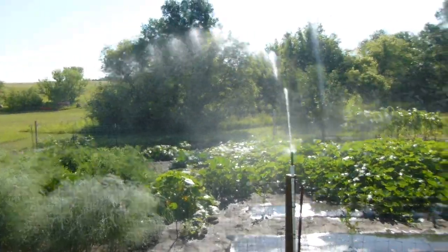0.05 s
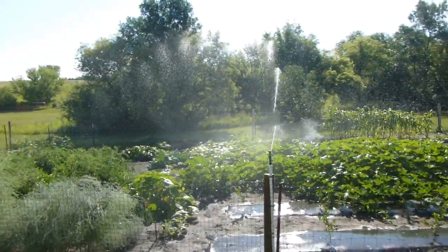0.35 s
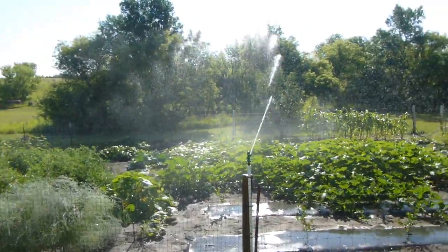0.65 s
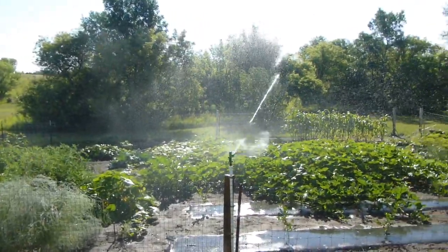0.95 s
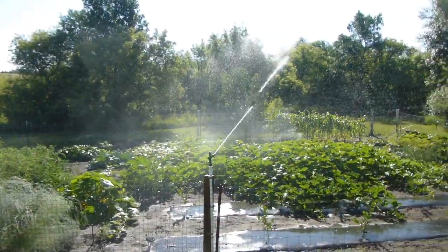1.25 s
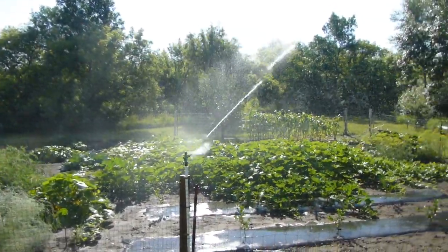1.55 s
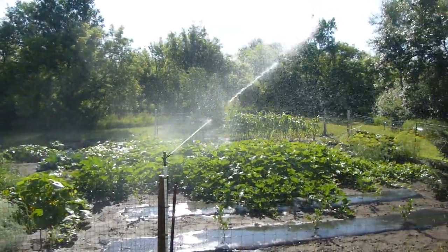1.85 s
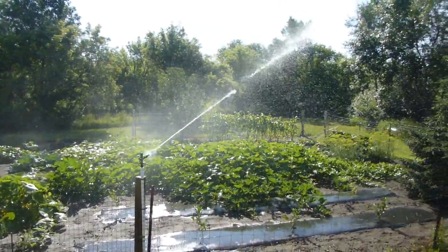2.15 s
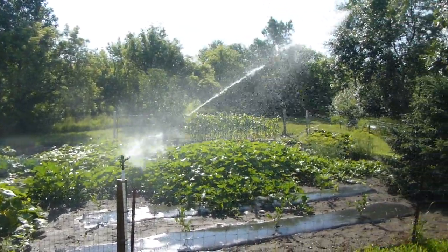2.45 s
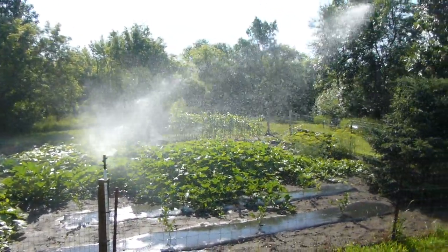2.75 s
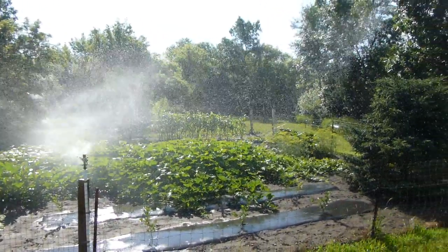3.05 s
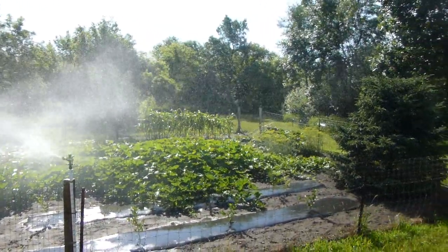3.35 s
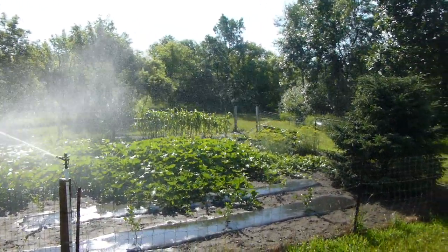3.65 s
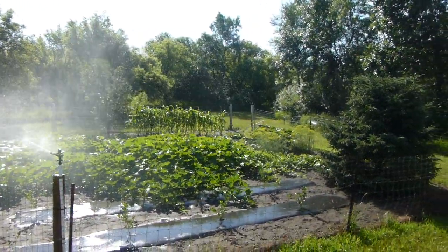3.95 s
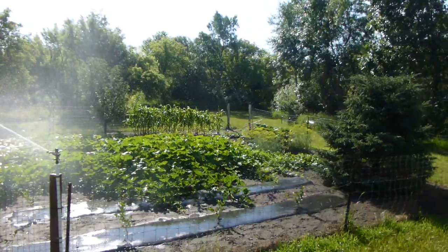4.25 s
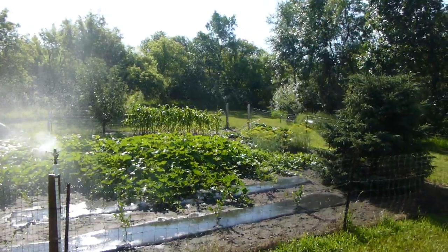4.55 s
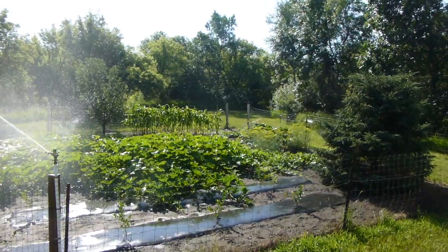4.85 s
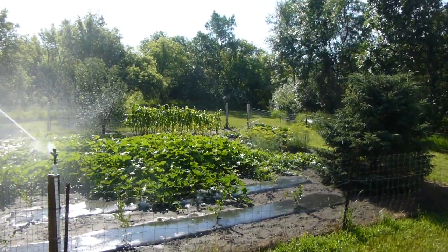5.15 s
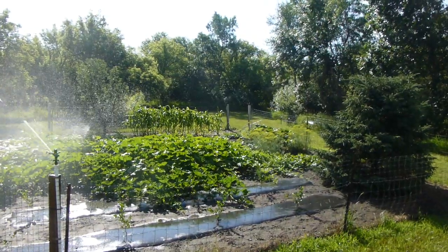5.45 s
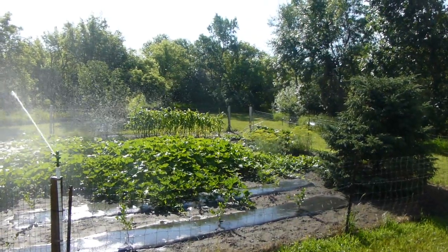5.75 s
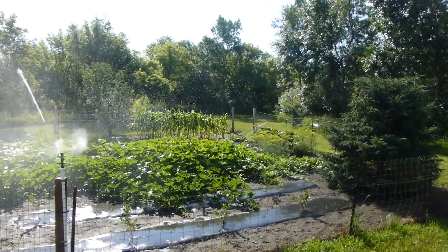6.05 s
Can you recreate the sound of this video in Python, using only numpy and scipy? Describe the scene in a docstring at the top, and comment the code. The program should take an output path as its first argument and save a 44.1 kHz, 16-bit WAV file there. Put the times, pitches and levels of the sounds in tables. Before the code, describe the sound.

Steady, splashy ticks from a garden sprinkler break into a brief, rapid hissing rattle and carry on, with drops pattering softly on leaves.

```python
"""Wet garden. An impact sprinkler on a post steps round at 8 Hz, chatters back at 21 Hz, steps on.
Each step: the sprung arm cuts into the jet, strikes the frame and leaves the jet.
The frame rings differently as the head turns. Throughout, drops patter on leaves and soil,
an insect buzzes thinly and a far engine drones. Air puffs and soft bumps reach the microphone."""
import sys
import numpy as np
from scipy import signal
from scipy.fft import rfft, irfft
from scipy.io import wavfile

SR = 44100
rng = np.random.default_rng(int(sys.argv[2]) if len(sys.argv) > 2 else 0)


def bounce(signal):
    """Save signal as a 16-bit WAV file at the path given by the first command-line argument."""
    frames = np.transpose(np.atleast_2d(signal))
    limited = np.clip(frames, -1, 1)
    pcm = np.round(limited * 32767).astype(np.int16)
    wavfile.write(sys.argv[1], SR, pcm)


N = 272979
TIME_S = np.arange(N) / SR

# drops on soil or leaves (time [s], level [dB])
PATTER_LEVELS = [(0, -42), (2.4, -42.5), (3.35, -38), (3.65, -42), (4.15, -39), (4.75, -47.5),
                 (5.35, -44.5), (6.19, -43.5)]
# insect swell and fade (time [s], level [dB])
INSECT_LEVELS = [(0, -45.5), (1.4, -46), (2, -42.5), (2.9, -41), (4.1, -50), (4.7, -43), (5.7, -42),
                 (6.19, -39)]
# engine harmonics (order [x turning rate], level [dB])
ENGINE_ORDERS = [(3, -74), (4, -62.5), (5, -60.5), (6, -56), (7, -60), (8, -64), (9, -63.5), (10, -59.5),
                 (11, -58), (12, -59.5), (13, -60.5), (16, -64), (19, -62)]
# forward sweeps (first strike [s], strikes [count], period [s], period change [s/swing])
FORWARD_SWEEPS = [(.01446, 21, .124017, -.0000204), (3.51238, 22, .122351, .0001295)]
# forward step levels (time [s], strike [dB], splash [dB], knock [dB])
STEP_LEVELS = [(0, -19, -26.5, -30.5), (.9, -19, -26.5, -26.5), (1.4, -18.5, -25, -25.5),
               (2.15, -19.5, -25, -31), (2.49, -17.5, -24, -25), (3.5, -18, -26.5, -32),
               (4.2, -21.5, -25.5, -32.5), (4.8, -23.5, -27, -29.5), (5.4, -22, -27, -30),
               (6.19, -24, -25.5, -30)]
# nozzle direction (time [s], heading [deg right of ahead])
NOZZLE_HEADING = [(0, -8), (2.49, 62), (3.42, -87), (6.19, -12)]
# sprinkler position (time [s], left minus right [dB])
SPRINKLER_PAN = [(0, -1), (1.75, 1.6), (4.2, 4.5), (6.19, 4)]
# frame modes (frequency [Hz], level [dB], t60 [s], loudest heading [deg], lobe width [deg])
FRAME_MODES = [(1538, -8, 0.038, 58, 17), (1565, 0, 0.033, -69.5, 11.5), (2680, -1, 0.021, 45, 15),
               (2980, 5, 0.018, 41, 16), (3027, 2.5, 0.028, 27, 13), (3103, 5, 0.038, -12, 23),
               (3166, 6, 0.028, -35, 23.7), (3535, 1, 0.023, 40, 27), (3587, 2, 0.04, -63.5, 11),
               (4095, -5, 0.045, 41, 19), (4140, -4, 0.032, -69, 16), (4670, 3, 0.03, -66, 15),
               (5440, -6, 0.043, 30, 32), (6100, 4, 0.034, 44, 14), (6540, 7, .015, 61, 6),
               (7240, 8.5, 0.02, 10.5, 10.5), (7530, 3, 0.018, 14, 54), (8140, 6, 0.031, 38, 12),
               (9400, 20.5, 0.0036, -55, 14), (9900, 1, 0.03, 44, 16), (9820, 7.5, 0.027, -39, 19),
               (10500, 6, 0.018, -86, 11), (10700, 16, 0.0077, -29, 24), (11400, 5, 0.025, -33, 7.8),
               (12700, -5, .035, 32, 15)]
# riser and post modes (frequency [Hz], level [dB], t60 [s], loudest heading [deg], lobe width [deg])
POST_MODES = [(533, -9, 0.031, -9, 79), (612, -2, 0.032, -52, 20), (681, 4.5, 0.034, -46, 31),
              (761, 3, 0.045, -5, 28), (880, 3, 0.033, 17, 28), (1085, 1.5, 0.035, 27, 62),
              (1290, -11, 0.015, 0, 57), (1302, 0.5, 0.028, -3, 64), (1440, -0.5, 0.03, 4, 92),
              (1544, 2, 0.031, -40, 140), (1740, 1, 0.026, -43, 17), (2032, 4.5, 0.024, -52, 50),
              (2310, 0, 0.032, 2, 190)]
# returns along the pipe (delay [s], level [dB])
PIPE_RETURNS = [(0.021, 1), (.03, -1), (.06, -16)]
# air puffs on the microphone (centre [s], half length [s], level [dB])
AIR_PUFFS = [(1.223, 0.11, -50), (1.5, 0.11, -50), (1.84, .2, -46.5), (3.473, .1, -52)]
# bumps on the microphone (time [s], level [dB], frequency [Hz])
MIC_BUMPS = [(1.582, -29.5, 210), (1.698, -31, 158), (2.432, -33, 179), (3.429, -29, 158),
             (3.495, -31.5, 126), (4.283, -27.5, 194)]
# fast swing back (first stop [s], stops [count], period [s], period change [s/swing])
RETURN_SWEEP = (2.5579, 19, .049476, -.000205)
# spray fan, quietest pointing straight away (time [s], level [dB])
FAN_LEVELS = [(2.55, -23.5), (2.8, -29), (3.03, -28), (3.18, -24), (3.42, -24)]
# spray deflector resonances (frequency [Hz], width [Hz], gain [dB])
DEFLECTOR_PEAKS = [(3170, 120, 5), (3680, 150, 7.5), (4100, 130, 11), (4740, 140, 8), (5130, 150, 2.5),
                   (8700, 180, 2), (9400, 200, 1)]
# trip lever clicks (time [s], level [dB])
LEVER_CLICKS = [(3.3690, -27), (3.3848, -23)]

# spectra (frequency [Hz], relative density [dB])
PATTER_SPECTRUM = [(150, -28), (420, -5), (650, 1.5), (1000, -2.5), (1500, -5), (2100, -9.5), (3100, -9),
                   (5000, -11.5), (9000, -14), (15000, -24)]  # landing drops
INSECT_SPECTRUM = [(3000, -11.5), (9000, -12), (10800, -4), (12100, -2), (13800, -6), (15500, -15)]  # wing hiss
AIR_SPECTRUM = [(20, -8), (48, -28), (75, -18), (115, -0.5), (200, 4.5), (330, 5), (450, -8), (900, -14),
                (3000, -42)]  # outdoor rumble
SPLASH_SPECTRUM = [(300, -12.5), (800, -3), (2000, -8.5), (3500, -2), (5500, -0.5), (8000, 0.5),
                   (10500, -1), (13000, -4), (15500, -9)]  # jet on the arm
CRACK_SPECTRUM = [(300, -16.5), (1200, -11.5), (2200, -11), (3200, -1), (7000, 4), (11000, -1), (13000, -6),
                  (15500, -4)]  # hard contact
PIPE_SPECTRUM = [(1500, -61), (2800, -21), (3010, 6), (3100, -8.5), (3190, 3.5), (3420, -30), (6000, -74)]  # ping in the pipe
FAN_SPECTRUM = [(400, -18), (1200, -12.5), (2700, -7), (3600, -8.5), (5000, -1.5), (8500, 0), (11000, -1.5),
                (13500, -6), (15500, -9)]  # fanned jet
PORT_SPECTRUM = [(400, -27), (1300, 10), (3000, -3.5), (9000, .5), (13000, 6.5), (16000, -1)]
RUFFLE_SPECTRUM = [(50, -18), (100, -5), (160, 1.5), (230, -4.5), (400, -17), (1500, -49)]


def amp(db):
    """dB to gain."""
    return 10 ** (np.asarray(db) / 20)


def unit(x):
    """Scale to rms 1."""
    return x / np.sqrt(np.mean(x ** 2) + 1e-20)


def curve(rows, at, column=1):
    """Interpolate a table column along the first."""
    rows = np.array(rows)
    return np.interp(at, rows[:, 0], rows[:, column])


def add(mix, at_s, sound):
    """Mix in place."""
    start = round(at_s * SR)
    sound = sound[max(-start, 0):]
    part = mix[max(start, 0):][:len(sound)]
    part += sound[:len(part)]


def colour(x, spectrum, peaks=(), size=4096):
    """Minimum-phase filter, unit power gain."""
    hz = abs(np.fft.fftfreq(size, 1 / SR))
    points_hz, points_db = np.transpose(spectrum)
    db = np.interp(np.log(hz + 1), np.log(points_hz), points_db)
    db += sum(peak_db / (1 + (2 * (hz - peak_hz) / width_hz) ** 2) for peak_hz, width_hz, peak_db in peaks)
    response = np.exp(np.conj(signal.hilbert(np.log(amp(db)))))
    taps = np.fft.ifft(response).real[:size // 2]
    return signal.oaconvolve(x, taps / np.linalg.norm(taps))[:N]


def drift(band_hz):
    """Low-passed noise, rms 1."""
    hz = np.fft.rfftfreq(N, 1 / SR)
    return unit(irfft(rfft(rng.standard_normal(N)) * np.exp(-(hz / band_hz) ** 2), N))


def drops(per_s, spread_db):
    """Random droplet impacts, a few much larger; rms 1."""
    sizes = amp(spread_db * np.minimum(rng.exponential(1, N), 5)) * rng.choice([-1, 1], N)
    return unit(sizes * (rng.random(N) < per_s / SR))


def stereo(make, shared):
    """Two random channels with a shared power fraction."""
    return np.sqrt(shared) * make() + np.sqrt(1 - shared) * np.array([make(), make()])


def burst(t, t60_s):
    """Decaying noise; energy of 3 ms at rms 1."""
    noise = (rng.random(len(t)) - .5) * amp(-60 * t / t60_s)
    return noise / np.linalg.norm(noise) * np.sqrt(.003 * SR)


def aimed(heading_deg, facing_deg, lobe_deg):
    """Gaussian directivity gain."""
    return np.exp(-.5 * ((heading_deg - facing_deg) / lobe_deg) ** 2)


def modes(t, table, heading_deg):
    """Decaying sines weighted by heading, varied per blow."""
    hz, db, t60_s, facing_deg, lobe_deg = np.transpose(table)[:, :, None]
    detune, phase, vary_db = rng.standard_normal((3, len(hz), 1))
    envelopes = aimed(heading_deg, facing_deg, lobe_deg) * amp(db + vary_db - 60 * t / t60_s)
    sines = np.sin(2 * np.pi * (hz * (1 + .0026 * detune) * t + phase))
    return (envelopes * sines).sum(0)


def scatter(x, t60_s, delay_s, patterns=4):
    """Dense decaying reflections; patterns crossfade with heading."""
    t = np.arange(SR // 5) / SR
    heading_rad = np.radians(curve(NOZZLE_HEADING, TIME_S))
    out = np.zeros(N)
    for k in range(patterns):
        taps = rng.standard_normal(len(t)) * amp(-60 * t / t60_s) * (t > delay_s)
        share = np.cos(4 * heading_rad + np.pi * k / patterns) * np.sqrt(2 / patterns)
        out += signal.oaconvolve(x * share, taps / np.linalg.norm(taps))[:N]
    return out


def patter(flicker_db=1.06, pan_db=1.8):
    """Drops land on leaves and soil."""
    impacts = stereo(lambda: colour(drops(per_s=5000, spread_db=2), PATTER_SPECTRUM), shared=.71)
    level_db = curve(PATTER_LEVELS, TIME_S) + flicker_db * drift(band_hz=19)
    return impacts * amp(level_db + np.outer([.5, -.5], pan_db))


def insect(stroke_hz=43, depth=.32, pan_db=-1):
    """Wing strokes chop a thin, high hiss."""
    cycles = np.cumsum(stroke_hz * (1 + .05 * drift(band_hz=6))) / SR
    strokes = unit(1 + depth * np.cos(2 * np.pi * cycles))
    hiss = stereo(lambda: colour(rng.standard_normal(N), INSECT_SPECTRUM), shared=.21)
    return hiss * strokes * amp(curve(INSECT_LEVELS, TIME_S) + np.outer([.5, -.5], pan_db))


def far_engine(turn_hz=29.07, gain_db=-1.5, waver_db=2.66, waver_rad=.5):
    """Harmonics of the turning rate; each wavers on its own path."""
    turns = np.cumsum(turn_hz * (1 + .00197 * drift(band_hz=1.5))) / SR
    drone = np.zeros(N)
    for order, db in ENGINE_ORDERS:
        gain = amp(db + waver_db * drift(band_hz=2))
        phase_rad = 2 * np.pi * (order * turns + rng.random()) + waver_rad * drift(band_hz=5.2)
        drone += gain * np.sin(phase_rad)
    return amp(gain_db) * np.sqrt(2) * drone


def outdoor_rumble(level_db=-54):
    """Steady low noise."""
    return amp(level_db) * stereo(lambda: colour(rng.standard_normal(N), AIR_SPECTRUM), shared=.4)


def swings(start_s, count, period_s, change_s):
    """Beat times [s] of the sprung arm; period changes linearly."""
    k = np.arange(count)
    return start_s + period_s * k + change_s * k ** 2 / 2


def forward_steps(vary_db=(.87, .3, .5)):
    """Slightly uneven steps (time [s], strike [dB], splash [dB], knock [dB])."""
    times_s = np.concatenate([swings(*sweep) for sweep in FORWARD_SWEEPS])
    levels_db = np.transpose([curve(STEP_LEVELS, times_s, column) for column in (1, 2, 3)])
    return np.column_stack([times_s, levels_db + rng.standard_normal(levels_db.shape) * vary_db])


def jet_slaps(steps, enter_s=-.0036, enter_db=-1, leave_s=.0185, leave_db=-2, vary_db=2):
    """Arm slaps the jet on entry and exit; loudest with the nozzle pointing left."""
    t = np.arange(SR // 50) / SR
    snaps = np.zeros(N)
    for at_s, _, splash_db, _ in steps:
        directivity = aimed(curve(NOZZLE_HEADING, at_s), facing_deg=-70, lobe_deg=35)
        for delay_s, slap_db in ((enter_s, enter_db), (leave_s, leave_db)):
            gain = directivity * amp(splash_db + slap_db + vary_db * rng.standard_normal())
            add(snaps, at_s + delay_s, gain * burst(t, t60_s=.005))
    return colour(snaps, SPLASH_SPECTRUM)


def spray_envelope(beats, gain_db, enter_s, leave_s, rise_db_per_s, sag_db, drop_db, fade_db_per_s):
    """Per jet crossing: spray builds, sags as the arm reverses, drops on exit; mist fades."""
    t = np.arange(-SR // 16, SR // 8) / SR
    crossed = np.clip((t - enter_s) / (leave_s - enter_s), 0, 1)
    before_s, after_s = np.maximum(enter_s - t, 0), np.maximum(t - leave_s, 0)
    swell_db = gain_db - rise_db_per_s * before_s - sag_db * np.sin(np.pi * crossed)
    swell_db -= drop_db * np.minimum(after_s / .0019, 1) + fade_db_per_s * after_s
    power = np.zeros(N)
    for at_s, db in beats:
        add(power, at_s + t[0], amp(db + swell_db) ** 2)
    return np.sqrt(power)


def step_spray(steps, flicker_db=1.5):
    """Jet shatters into droplets on the arm."""
    beats = steps[:, ::2]  # (time [s], splash [dB])
    flow = spray_envelope(beats, gain_db=.1, enter_s=-.0023, leave_s=.019,
                          rise_db_per_s=4500, sag_db=3, drop_db=4.5, fade_db_per_s=430)
    spray = drops(per_s=16000, spread_db=2.5) * flow * amp(flicker_db * drift(band_hz=660))
    return colour(spray, SPLASH_SPECTRUM)


def strikes(steps, crack_db=-3, ring_db=-3, bounce_s=.0025, bounce_db=-6, post_db=-4, post_s=.002243):
    """Arm hits the frame and bounces once; the light frame rings at once, the heavy post lags."""
    t = np.arange(SR // 12) / SR
    frame_attack = 1 - np.exp(-t / .00059)
    post_attack = 1 - np.exp(-t / .00082)
    crack, ring = np.zeros((2, N))
    for at_s, strike_db, _, knock_db in steps:
        heading_deg = curve(NOZZLE_HEADING, at_s)
        add(crack, at_s - .0003, amp(strike_db + crack_db) * burst(t, t60_s=.0055))
        rebound_s = at_s + bounce_s * rng.uniform(.8, 1.1)
        add(crack, rebound_s, amp(strike_db + bounce_db) * burst(t, t60_s=.016))
        add(ring, at_s, amp(strike_db + ring_db) * frame_attack * modes(t, FRAME_MODES, heading_deg))
        knock = post_attack * modes(t, POST_MODES, heading_deg)
        add(ring, at_s + post_s, amp(knock_db + post_db) * knock)
    return colour(crack, CRACK_SPECTRUM) + ring


def pipe_echo(blows, gain_db=-24):
    """Each strike's ping runs along the pipe and returns faint and smeared."""
    directivity = aimed(curve(NOZZLE_HEADING, TIME_S), facing_deg=5.7, lobe_deg=27)
    ping = colour(blows, PIPE_SPECTRUM) * directivity * amp(gain_db)
    echoes = np.zeros(N)
    for delay_s, db in PIPE_RETURNS:
        add(echoes, delay_s, amp(db) * scatter(ping, t60_s=.026, delay_s=0))
    return echoes


def mic_ports(x, side_db=-12):
    """Direct sound plus device-body reflections, opposite in sign at the two ports."""
    side = colour(scatter(x, t60_s=.0092, delay_s=.0002), PORT_SPECTRUM)
    return x + amp(side_db) * np.array([side, -side])


def garden_reflections(x, near_db=-14, far_db=-23):
    """Ground and near leaves scatter; trees add a faint tail."""
    out = np.zeros((2, N))
    for channel in out:
        channel += amp(near_db) * scatter(x, t60_s=.027, delay_s=.00054)
        channel += amp(far_db) * scatter(x, t60_s=.36, delay_s=.017)
    return out


def air_ruffle(flicker_db=2.1):
    """Low flutter on the microphone, one swell per air puff."""
    flutter = stereo(lambda: colour(rng.standard_normal(N), RUFFLE_SPECTRUM), shared=.39)
    swell = sum(amp(db) * np.exp(-((TIME_S - at_s) / half_s) ** 2) for at_s, half_s, db in AIR_PUFFS)
    return flutter * swell * amp(flicker_db * drift(band_hz=17))


def mic_bumps(gain_db=-2, half_s=.0046):
    """Soft low thumps, a cycle or two each."""
    t = np.arange(-SR // 30, SR // 30) / SR
    window = np.exp(-(t / half_s) ** 2)
    thumps = np.zeros(N)
    for at_s, db, hz in MIC_BUMPS:
        add(thumps, at_s + t[0], amp(db + gain_db) * window * np.cos(2 * np.pi * (hz * t + rng.random())))
    return thumps


def return_chatter(clack_db=-7, vary_db=1.5, flicker_db=.74):
    """Arm stays near the jet, fans it out and clacks at each stop."""
    t = np.arange(SR // 40) / SR
    stops_s = swings(*RETURN_SWEEP)
    beats = np.column_stack([stops_s, curve(FAN_LEVELS, stops_s)])
    flow = spray_envelope(beats, gain_db=1, enter_s=-.015, leave_s=-.0015,
                          rise_db_per_s=518, sag_db=3.5, drop_db=11, fade_db_per_s=350)
    fan = drops(per_s=18000, spread_db=1.5) * flow * amp(flicker_db * drift(band_hz=480))
    clacks = np.zeros(N)
    for at_s, db in beats:
        gain = amp(db + clack_db + vary_db * rng.standard_normal())
        add(clacks, at_s - .0015, gain * burst(t, t60_s=.0068))
    return colour(fan, FAN_SPECTRUM, DEFLECTOR_PEAKS) + colour(clacks, CRACK_SPECTRUM)


def trip_lever():
    """Lever flips near the end of the return: two clicks."""
    t = np.arange(SR // 40) / SR
    clicks = np.zeros(N)
    for at_s, db in LEVER_CLICKS:
        add(clicks, at_s, amp(db) * burst(t, t60_s=.0047))
    return colour(clicks, CRACK_SPECTRUM)


def scene():
    """Sprinkler drifts left in front of the wet garden."""
    steps = forward_steps()
    blows = strikes(steps)
    head = blows + pipe_echo(blows) + jet_slaps(steps) + step_spray(steps)
    head += return_chatter() + trip_lever()
    pan = amp(np.outer([.5, -.5], curve(SPRINKLER_PAN, TIME_S)))
    sprinkler = pan * (mic_ports(head) + garden_reflections(head))
    background = patter() + insect() + far_engine() + outdoor_rumble()
    return sprinkler + background + mic_bumps() + air_ruffle()


def record(dry, cutoff_hz=15450):
    """Linear-phase low-pass."""
    taps = signal.firwin(255, cutoff_hz, window=("kaiser", 8), fs=SR)
    return signal.oaconvolve(dry, taps[None], "same")


dry = scene()
out = record(dry)
bounce(out)
```